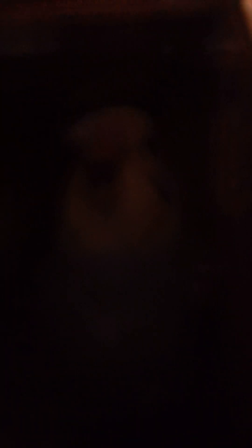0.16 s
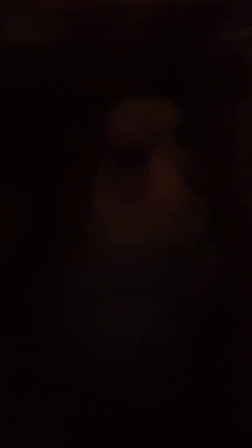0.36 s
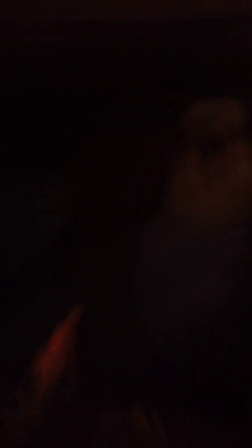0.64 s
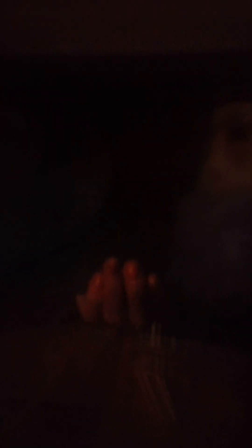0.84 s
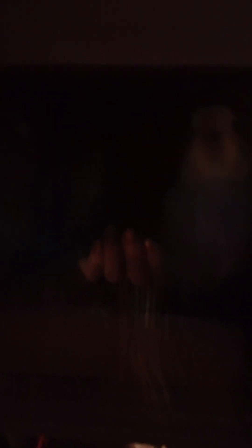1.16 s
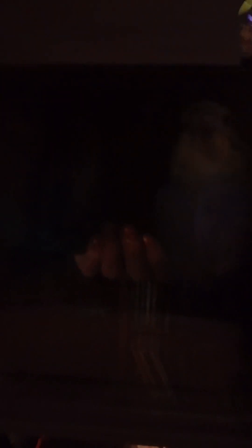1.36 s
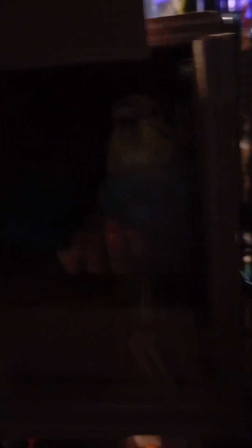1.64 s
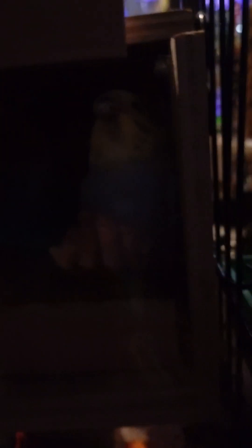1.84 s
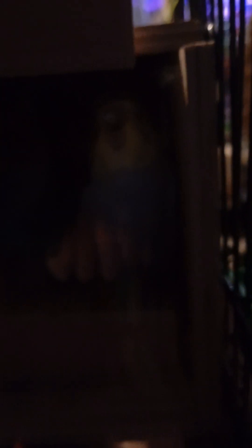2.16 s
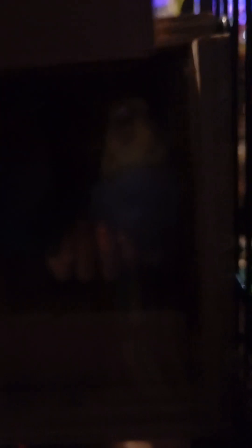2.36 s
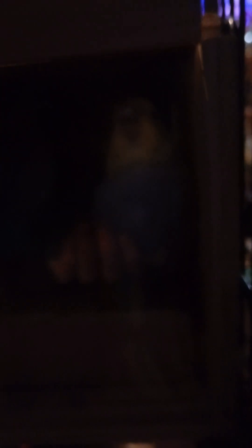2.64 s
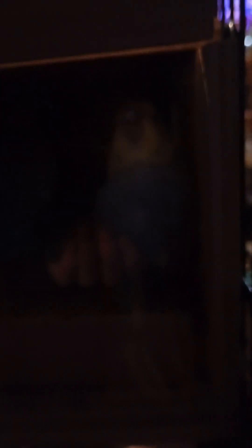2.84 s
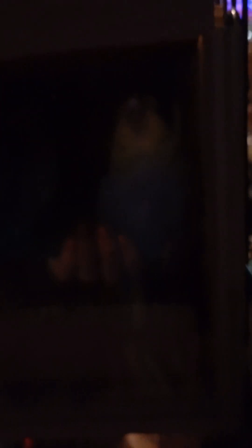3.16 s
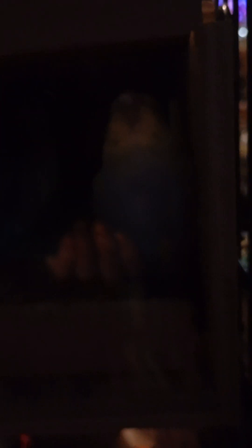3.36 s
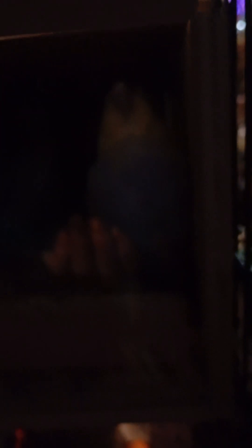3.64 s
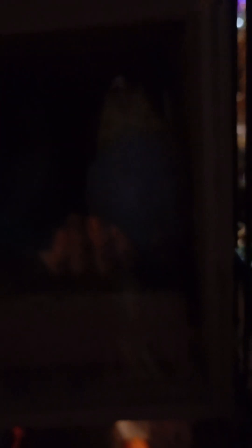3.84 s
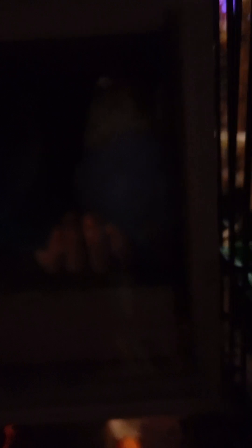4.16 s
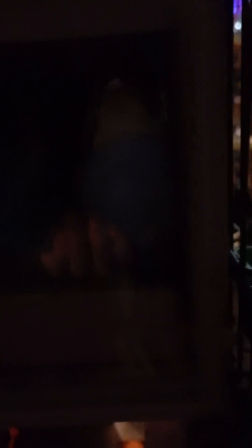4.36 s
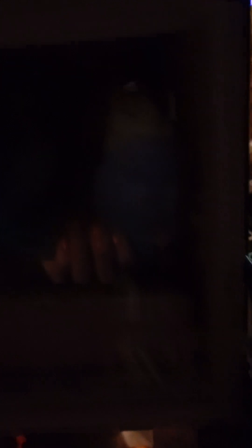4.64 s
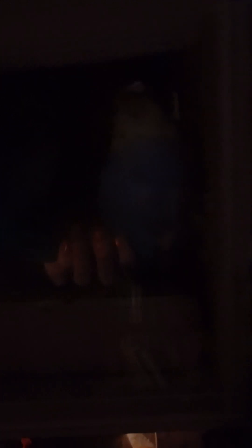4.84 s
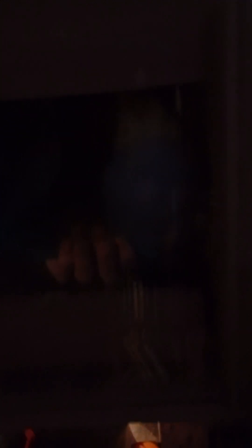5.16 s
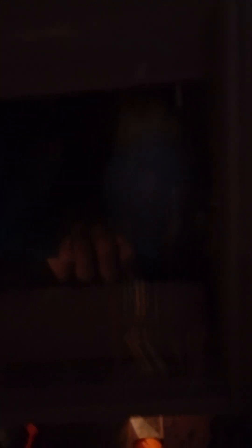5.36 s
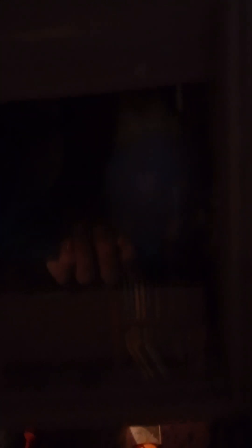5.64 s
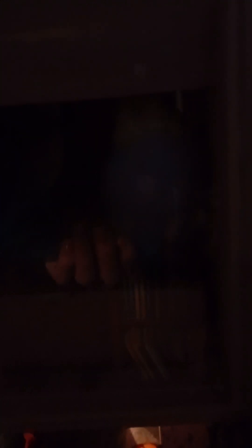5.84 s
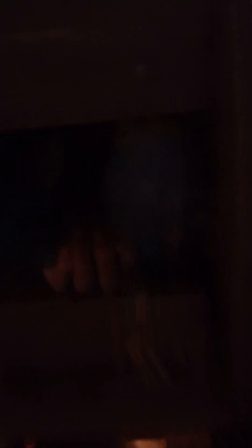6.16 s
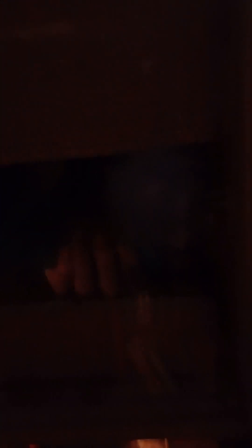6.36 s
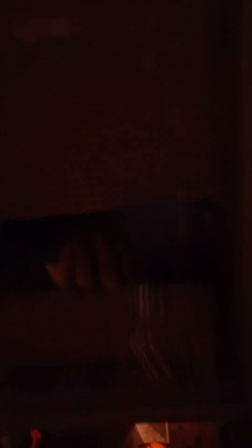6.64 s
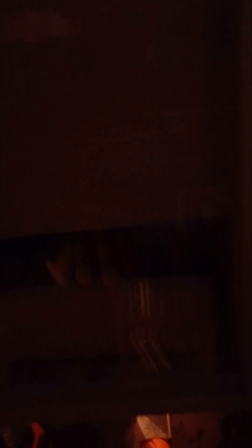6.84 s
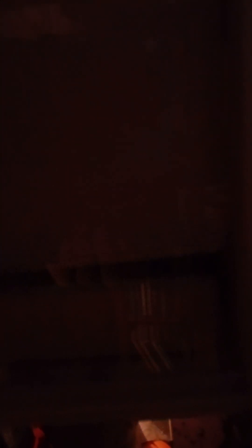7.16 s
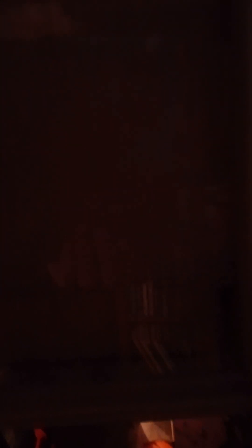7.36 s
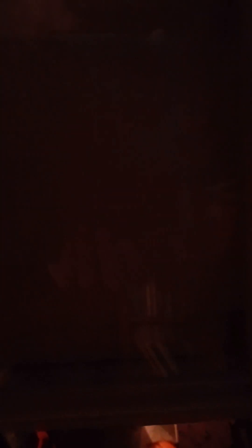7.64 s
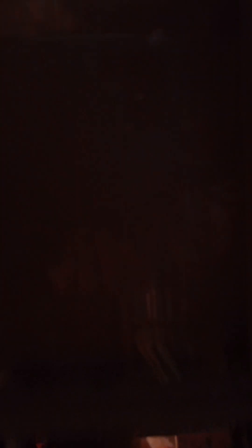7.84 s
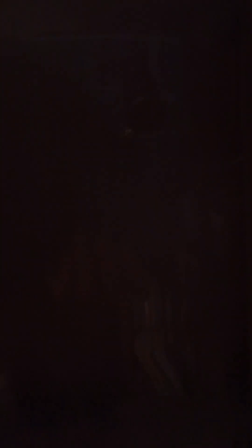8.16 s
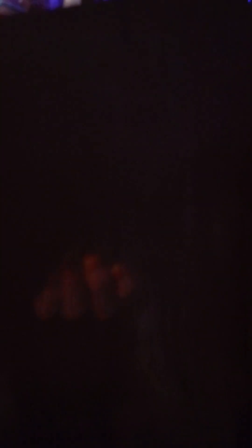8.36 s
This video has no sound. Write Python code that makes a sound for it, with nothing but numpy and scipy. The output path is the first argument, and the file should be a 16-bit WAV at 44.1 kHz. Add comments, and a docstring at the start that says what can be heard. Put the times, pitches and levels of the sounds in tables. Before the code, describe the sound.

Two budgie chicks beg without pause inside a hollow nest box, very close to the microphone in a quiet room. One gives hoarse, buzzy rasps about five times a second; a clearer one cheeps across it in quick rattling bursts. Small dull knocks dot the middle. From about six seconds a cover rustles as it slides, the clear cheeps weaken, and a hard thump with a click ends it.

```python
"""A nest box in a quiet room: two budgie chicks beg close to the microphone.
A hoarse one rasps about five times a second, and a clearer one cheeps across it.
Each call is a rattle of tiny, mostly upward pitch sweeps, coloured by the throat and the hollow box.
Knocks are short sinking tones with a noisy scuff; a tap is a bare click.
The box's cover, made of shaped noise, rustles as it slides, and a thump sounds near the end."""
import sys
import numpy as np
from scipy import signal
from scipy.fft import rfft, irfft, next_fast_len
from scipy.io import wavfile
from scipy.ndimage import uniform_filter1d, minimum_filter1d, map_coordinates

SR = 44100
rng = np.random.default_rng(int(sys.argv[2]) if len(sys.argv) > 2 else 0)


def persist_wave(psi):
    """Save psi, clipped to +-1, as 16-bit WAV."""
    counts = np.round(np.clip(psi, -1, 1) * 32767).astype(np.int16)
    wavfile.write(sys.argv[1], SR, np.atleast_2d(counts).T)


N = 375291  # length of the scene in samples

# calls of the clearer chick: start_s, end_s, level_db, swell_db (from opening to close)
CHEEPS = [(0.074, 0.236, -21, 0.5), (0.307, 0.468, -20, 0.5), (0.53, 0.669, -19, 1.5),
          (0.742, 0.887, -20.5, -0.5), (0.958, 1.103, -22, 3.5), (1.184, 1.324, -22, 1),
          (1.401, 1.534, -24, 7.5), (1.649, 1.795, -24.5, 1.5), (1.884, 2.046, -26, 6.5),
          (2.127, 2.271, -24, 5.5), (2.341, 2.501, -24.5, 7.5), (2.594, 2.753, -23, 0),
          (2.826, 2.992, -23.5, 3), (3.08, 3.256, -23.5, 5.5), (3.334, 3.516, -26, 6.5),
          (3.632, 3.841, -28, 11.5), (3.923, 4.112, -24, 6), (4.216, 4.402, -22, 0.5),
          (4.529, 4.691, -23, 4), (4.786, 4.997, -24, 4), (5.09, 5.262, -22.5, 2.5), (5.356, 5.528, -22, 4),
          (5.613, 5.802, -22, 3.5), (5.888, 6.071, -22, 1.5), (6.149, 6.366, -22, 4.5),
          (6.446, 6.62, -22.5, 0.5), (6.729, 6.893, -29.5, 9), (6.979, 7.182, -28, 4),
          (7.257, 7.437, -26.5, 5), (7.507, 7.7, -29, 6), (7.785, 8.002, -30, 1),
          (8.061, 8.275, -30.5, 10.5), (8.371, 8.506, -31, 1)]
# its calls grow purer as it settles, and a little lower: time_s, top_pitch_hz, overtone_db
CHEEP_VOICE = [(.1, 2679, 1.5), (.8, 2663, -1.5), (1.5, 2545, -2), (3.5, 2682, -2), (4.3, 2546, -3),
               (5.2, 2574, -8.5), (5.8, 2623, -8.5), (6.4, 2582, -13.5), (8.4, 2619, -13)]
# its voice colour: pitch_hz, gain_db
CLEAR_COLOUR = [(900, -32.5), (1450, 5.5), (2000, 4), (2420, -1.5), (2900, -1.5), (3300, 10.5), (4300, -4),
                (5100, 3.5), (6400, -6.5), (7700, -4.5), (10000, -11), (15000, -16)]

# calls of the hoarse chick: start_s, end_s, level_db (before its voice colour)
RASPS = [(.076, 0.165, -32.5), (.239, 0.333, -30), (0.428, .517, -32.5), (0.594, 0.665, -34.5),
         (.91, 1.009, -32.5), (1.099, 1.219, -33.5), (1.308, 1.421, -33.5), (1.501, 1.637, -37),
         (1.712, 1.821, -32.5), (1.892, 2.012, -31.5), (2.092, 2.205, -31), (2.278, 2.386, -30.5),
         (2.466, 2.571, -31.5), (2.664, 2.766, -32), (2.851, 2.967, -30), (3.048, 3.158, -30),
         (3.239, 3.344, -31), (3.438, 3.56, -32), (3.637, 3.756, -33), (3.837, 3.943, -32),
         (4.035, 4.143, -33.5), (4.23, 4.358, -32), (4.437, 4.554, -32), (4.643, 4.758, -34.5),
         (4.845, 4.957, -32.5), (5.044, 5.168, -32), (5.254, 5.37, -33.5), (5.472, 5.606, -33.5),
         (5.702, 5.828, -35.5), (5.944, 6.078, -32.5), (6.271, 6.391, -33.5), (6.473, 6.604, -31.5),
         (6.685, 6.817, -31), (6.892, 7.019, -31.5), (7.104, 7.234, -32), (7.324, 7.467, -31.5),
         (7.552, 7.683, -31.5), (7.779, 7.904, -31.5), (7.992, 8.117, -34.5), (8.19, 8.322, -35),
         (8.402, 8.519, -35)]
# its voice colour: pitch_hz, gain_db
HOARSE_COLOUR = [(400, -19), (700, -7.5), (900, 0), (1250, 6.5), (1800, 9), (2450, 13.5), (3000, 9.5),
                 (3900, -0.5), (5000, 8.5), (6100, 6.5), (7200, -19), (8500, -11.5), (10000, -30.5),
                 (15000, -40.5)]
# its throat tightens after the first calls, then slackens and rings more: time_s, resonance_hz, boost_db
THROAT = [(.08, 1105, 7.5), (.43, 1146, 6.5), (.91, 1454, 9), (3, 1486, 10.5), (6.45, 1537, 12),
          (7.8, 1299, 13.5), (8.4, 1313, 13.5)]
# its nasal colour, a peak or a hollow by turns: time_s, centre_hz, boost_db
NASAL = [(.08, 3500, 3), (.5, 3610, 10.5), (1.08, 3370, -3), (1.31, 3466, 20), (1.5, 3420, 24.5),
         (1.8, 3386, 10), (3.2, 3340, -2), (3.55, 3164, 8.5), (4.65, 3100, 3.5), (5.95, 3830, -8),
         (6.27, 3400, 1.5), (7.1, 3660, 0.5), (7.35, 3825, -14.5), (8.4, 3965, -6.5)]
# its beak resonance and the fizz: time_s, resonance_hz, boost_db, fizz_db (before the fizz colour)
BEAK = [(.08, 5400, -7, -39.5), (.24, 5660, 9.5, -34), (.6, 5660, 13.5, -40), (.91, 5490, 3, -44.5),
        (1.31, 5540, -4, -53), (1.65, 5170, 9.5, -45.5), (2.22, 5748, 13.5, -36), (2.9, 5507, 11.5, -42.5),
        (3.84, 5697, 12, -39.5), (5.04, 5225, 9.5, -40.5), (5.7, 5275, 9.5, -41.5), (6.4, 6002, 3.5, -40.5),
        (6.85, 5210, 5.5, -44), (7.55, 5600, 0.5, -44), (8.2, 6120, 6, -42.5)]
# colour of the fizz, the rasp's highest overtones: pitch_hz, gain_db
FIZZ_COLOUR = [(2000, -52), (6500, 7), (8400, 1.5), (9500, -5), (12000, -3), (13500, -15), (15800, -19.5)]
# the fizz turns duller or brighter as the chick shifts: time_s, tilt_db_per_octave
FIZZ_TILT = [(0, -4), (2, -7), (4, 0.5), (6, -1.5), (8.5, 8)]

# peaks and a hollow of the nest box: centre_hz, half_width_hz, boost_db
BOX = [(916.3, 32.4, 7), (1555, 34.8, 3), (2414, 193, 5.5), (3370, 203, 1.5), (4266, 716, -3),
       (4933.4, 50, 2), (5843, 42.3, 4), (8640, 254, 3)]
# time for an echo to fade by 60 dB, in the box and in the room: pitch_hz, fade_s
BOX_DECAY = [(500, .04), (2500, .05), (6000, .04), (14000, .03)]
ROOM_DECAY = [(300, 0.265), (2500, 0.107), (6000, 0.195), (14000, 0.17)]

# knocks on the box: start_s, thud_peak_db, starting_pitch_hz, scuff_db (against the thud), fade_s (by 60 dB)
KNOCKS = [(1.617, -27, 160, 0.5, 0.027), (3.5, -47, 110, -22, .06), (3.884, -31.5, 351, -1.5, 0.0355),
          (4.005, -42.5, 349.5, -2.5, 0.0908), (4.252, -30, 423.5, -5.5, 0.128),
          (4.267, -30.5, 628, -10, 0.063), (4.599, -37.5, 189.4, -7.5, 0.048),
          (4.873, -39.5, 262, -5, 0.069), (4.925, -39.5, 198, -4.5, 0.057), (5.45, -48.5, 198.7, -6, 0.056),
          (5.541, -40.5, 139, -11, 0.053), (5.949, -37, 169.3, -11.5, 0.0528),
          (8.14, -43.5, 255, -25.5, 0.142), (8.44, -8.5, 207.6, -9, 0.0153)]
# sharp taps of the cover: start_s, starting_level_db
TAPS = [(8.494, -0.5)]
# pushes of the cover: loudest_s, length_s, rustle_db, rumble_db
PUSHES = [(6.596, 0.99, -52, -77.5), (7.254, 0.409, -49, -72.5), (7.84, 0.325, -45, -77),
          (8.151, 0.43, -64.5, -62), (8.329, 0.174, -58.5, -49), (8.491, 0.128, -40.5, -39.5)]

# noise colours of the cover and the room, before levelling: pitch_hz, density_db
RUSTLE = [(60, -24), (170, -11.5), (260, 5.5), (400, -10.5), (700, -3.5), (1200, -4.5), (2500, -10),
          (10000, -42.5)]
RUMBLE = [(25, -24), (60, -5.5), (105, 17.5), (170, -6), (400, -50)]
ROOM_TONE = [(20, -35), (50, -4.5), (100, 2.5), (170, -5.5), (260, -3.5), (340, 5), (450, -10.5),
             (900, 1.5), (2500, -3.5), (8000, -16.5), (15800, -54)]

TOP_HZ = 15830  # nothing sounds above this
CHEEP_RISE_S, CHEEP_FALL_S = 0.0051, 0.0158
CHEEP_ARCH_DB = 0.46  # the middle of a call stands this far above its swell
CHEEP_OPENING, CHEEP_SINK_S = .1, .028  # a call opens this sharp (log pitch), then sinks
CHEEP_SCATTER = .07  # pitch scatter from pulse to pulse (log pitch), before vigour
RIPPLE_DB, RIPPLE_HZ = 3, 1704  # bands in the fizz and their typical spacing
THUD_SAG_S = 0.3  # a thud's pitch sinks with this time constant
PUSH_FADE_DB = 16.5  # a push starts and ends this far below its peak


def amp(db):
    """Turn decibels into a gain."""
    return 10 ** (np.asarray(db) / 20)


def unit(x):
    """Bring a sound to an average (rms) level of 1."""
    return x / np.sqrt(np.mean(x ** 2) + 1e-20)


def at(curve, s):
    """Read every column of a curve at time s."""
    times, *columns = np.transpose(curve)
    return [np.interp(s, times, column) for column in columns]


def along(points, hz):
    """Read a table of values by frequency, on a log axis as the ear hears pitch."""
    f, v = np.transpose(points)
    return np.interp(np.log(hz + 1), np.log(f), v)


def bell(hz, centre_hz, width_hz):
    """The shape of one resonance: 1 at its centre, half that one width away."""
    return 1 / (1 + ((hz - centre_hz) / width_hz) ** 2)


def wobble(n, rate):
    """A smooth random curve of n samples, with rate knots a second."""
    knots = rng.standard_normal(int(n * rate / SR) + 4)
    return map_coordinates(knots, [np.arange(n) * rate / SR])


def add(track, s, sound):
    """Mix a sound into the track at time s."""
    start = max(0, round(s * SR))
    place = track[start:start + len(sound)]
    place += sound[:len(place)]


def fade(n, rise, fall):
    """Open and close a call with straight ramps, in seconds."""
    t = np.arange(n) / SR
    return np.clip(t / rise, 0, 1) * np.clip((n / SR - t) / fall, 0, 1)


def filtered(x, gain):
    """Change the strength of each frequency in x."""
    m = next_fast_len(N + 8192)
    return irfft(rfft(x, m) * gain(np.fft.rfftfreq(m, 1 / SR)), m)[:N]


def noise(spectrum):
    """Coloured noise at an rms level of 1."""
    white = rng.standard_normal(N)
    return unit(filtered(white, lambda hz: amp(along(spectrum, hz))))


def resonate(x, colour_db, size=2048):
    """Ring x through a voice colour and the box's resonances, with no ringing ahead of the sound."""
    hz = np.fft.rfftfreq(size, 1 / SR)
    box_db = sum(peak * bell(hz, centre, width) for centre, width, peak in BOX)
    cepstrum = irfft(np.log(amp(colour_db(hz) + box_db)))
    # folding the cepstrum onto positive times makes the ringing follow the sound
    cepstrum[1:size // 2] *= 2
    cepstrum[size // 2 + 1:] = 0
    ringing = irfft(np.exp(rfft(cepstrum)))
    return signal.fftconvolve(x, ringing)


def rattle(n, rate, uneven, count=48):
    """Uneven pulses: progress 0-1 through each, and its chance values (length, pitch, size, slant)."""
    chance = np.clip(rng.standard_normal((count, 4)), -2, 2)
    edges = np.r_[0, np.cumsum(np.exp(uneven * chance[:, 0]) / rate)]
    place = np.interp(np.arange(n) / SR, edges, np.arange(count + 1))
    return place % 1, chance[place.astype(int) % count].T


def clear_chick():
    """Each pulse is an arching whistle; longer ones start lower and sound louder, and a call opens high."""
    voice = np.zeros(N)
    for start, end, db, swell_db in CHEEPS:
        top_hz, overtone_db = at(CHEEP_VOICE, start)
        n = int((end - start + 0.0063) * SR)
        u, (length, pitch, size, slant) = rattle(n, rate=115, uneven=.13)

        # pitch: the arch is how far each moment lies below the top
        arch = np.interp(u ** np.exp(.25 * slant), [0, .18, .4, .64, 1], [1, .45, .12, 0, .35])
        opening = CHEEP_OPENING * np.exp(-np.arange(n) / SR / CHEEP_SINK_S)
        # gentle calls, poor in overtones, also sweep and scatter less
        vigour = amp(.4 * overtone_db)
        depth = (.5 + .1 * length) * vigour
        scatter = CHEEP_SCATTER * vigour * pitch
        f0 = top_hz * np.exp(opening + scatter - depth * arch + .025 * wobble(n, rate=900))
        phase = 2 * np.pi * np.cumsum(f0) / SR

        # tone: a whistle, flickering overtones and a little breath
        upper = np.sin(2 * phase)
        for k, part_db in [(3, -17), (4, -27.5), (5, -30.5)]:
            upper += amp(part_db) * np.sin(k * phase)
        overtones = amp(overtone_db + 2.18 * wobble(n, rate=230)) * upper
        whistle = np.sin(phase) + overtones + 0.035 * rng.standard_normal(n)

        # loudness: a push for each pulse, and a swell over the whole call
        push = np.interp(u, [0, .17, .42, .66, .86, 1], [0, .45, 1, .9, .08, 0])
        push *= amp(.6 * length + 1.9 * size)
        source = whistle * push * fade(n, CHEEP_RISE_S, CHEEP_FALL_S)
        call = unit(resonate(source, lambda hz: along(CLEAR_COLOUR, hz))[:n + SR // 100])
        effort_db = np.interp(np.arange(len(call)) / n, [1 / 6, 1 / 2, 5 / 6],
                              [-swell_db / 2, CHEEP_ARCH_DB, swell_db / 2])
        add(voice, start, amp(db + effort_db) * call)
    return voice


def hoarse_chick(count=24):
    """Each pulse is a few buzzy beats of the voice organ, speeding up, with restless overtones and fizz."""
    voice = np.zeros(N)
    for start, end, db in RASPS:
        throat_hz, throat_db = at(THROAT, start)
        nasal_hz, nasal_db = at(NASAL, start)
        tilt_db, = at(FIZZ_TILT, start)
        beak_hz, beak_db, fizz_db = at(BEAK, start)
        n = int((end - start + 0.00492) * SR)
        u, (length, pitch, size, slant) = rattle(n, rate=119, uneven=.07)

        # pitch: each pulse climbs about 1.45 octaves from near 660 Hz
        climb = 2 ** (1.45 * u * (1 + .2 * slant))
        scatter = .1 * pitch - 0.04915 * length + 0.02394 * wobble(n, rate=1000)
        f0 = 660 * climb * np.exp(scatter)
        phase = 2 * np.pi * np.cumsum(f0) / SR

        # tone: every overtone flickers by itself
        buzz = np.zeros(n)
        for k in range(1, count):
            flicker = amp(2.5 * wobble(n, rate=150))
            buzz += flicker * np.cos(k * phase + rng.uniform(0, 2 * np.pi)) * (k * f0 < TOP_HZ)
        breathy = unit(buzz) + .07 * rng.standard_normal(n)
        push = np.interp(u, [0, .12, .58, .79, .9, 1], [0, 1, 1, .4, .04, 0]) * amp(.9 * size)
        source = unit(push * fade(n, rise=.011, fall=.017) * breathy)

        def colour(hz):
            """Throat, nose and beak each strengthen or hollow out a band of the voice."""
            return (along(HOARSE_COLOUR, hz) + throat_db * bell(hz, throat_hz, width_hz=150)
                    + nasal_db * bell(hz, nasal_hz, width_hz=584) + beak_db * bell(hz, beak_hz, width_hz=530))

        # the band spacing shifts from call to call
        spacing_hz = RIPPLE_HZ * np.exp(rng.normal(0, 0.105))

        def fizz_colour(hz):
            """The highest overtones, tilted duller or brighter and rippled into bands."""
            tilt = tilt_db * np.log2(np.maximum(hz, 7000) / 10500)
            return along(FIZZ_COLOUR, hz) + tilt + RIPPLE_DB * np.cos(2 * np.pi * hz / spacing_hz)

        add(voice, start, amp(db) * resonate(source, colour))
        add(voice, start, amp(fizz_db) * resonate(source, fizz_colour))
    return voice


def knocks():
    """Dull blows sink in pitch and soon die away, with a short noisy scuff; taps are bare clicks."""
    thuds, scuffs, clicks = np.zeros((3, N))
    t = np.arange(SR // 6) / SR
    for s, db, hz, scuff_db, fade_s in KNOCKS:
        blow = (1 - np.exp(-t / 0.00128)) ** 2 * amp(-60 * t / fade_s)
        blow = amp(db) * blow / blow.max()
        phase = 2 * np.pi * np.cumsum(hz * np.exp(-t / THUD_SAG_S)) / SR
        add(thuds, s, blow * np.sin(phase))
        add(scuffs, s, amp(scuff_db) * blow)
    for s, db in TAPS:
        add(clicks, s, amp(db - 60 * t / 0.0013) * np.sin(2 * np.pi * 1100 * t))
    scuff_noise = noise([(40, -35), (120, -9), (400, 1), (750, -1.0), (1200, -16), (3000, -33)])
    return thuds + clicks + scuffs * scuff_noise


def cover():
    """Each push swells and fades: the cover rubs unevenly and shakes the box."""
    t = np.arange(N) / SR
    rub, shake = np.zeros((2, N))
    for s, length, rustle_db, rumble_db in PUSHES:
        swell = amp(-PUSH_FADE_DB * ((t - s) / (length / 2)) ** 2)
        rub += amp(rustle_db) * swell
        shake += amp(rumble_db) * swell
    uneven = amp(1.37 * wobble(N, rate=31))
    return rub * uneven * noise(RUSTLE) + shake * noise(RUMBLE)


def echoes(x, decay, delay, count=4):
    """Walls answer with a fading blur of noise, which drifts slowly through several random patterns."""
    out = np.zeros(N)
    place = np.linspace(0, 2 * count, N)  # passes through all the patterns twice
    for k in range(count):
        hz, t, z = signal.stft(rng.standard_normal(SR // 3), SR, nperseg=128)
        fading = z * amp(-60 * t / along(decay, hz)[:, None])
        tail = signal.istft(fading, SR, nperseg=128)[1]
        distance = abs((place - k + count / 2) % count - count / 2)
        share = np.sqrt(np.clip(1 - distance, 0, 1))
        add(out, delay, signal.oaconvolve(x * share, tail / np.linalg.norm(tail)))
    return out


def room_hush():
    """The quiet room's steady background noise."""
    return amp(-55) * noise(ROOM_TONE)


def scene():
    """Chicks in the echoing box, knocks on it, the room's faint answer, the cover and a steady hush."""
    chicks = clear_chick() + hoarse_chick()
    box_echo = amp(-6) * echoes(chicks, BOX_DECAY, delay=.0007, count=8)
    boxed = chicks + box_echo + knocks()
    room_echo = amp(-19.5) * echoes(boxed, ROOM_DECAY, delay=0.0071)
    return boxed + room_echo + cover() + room_hush()


def record(dry, size=45):
    """A quick limiter ducks the highest peaks; the microphone drops deep bass and all above TOP_HZ."""
    ceiling = .54
    needed = ceiling / np.maximum(abs(dry), ceiling)
    # hold the lowest gain around each peak, then smooth it; size is in samples
    gain = uniform_filter1d(minimum_filter1d(needed, 2 * size), size)
    low_cut_hz = 55

    def microphone(hz):
        """Bass falls away below the low cut; the top stops short."""
        return (hz < TOP_HZ) * hz ** 2 / np.hypot(hz ** 2, low_cut_hz ** 2)

    return filtered(np.ravel(dry * gain), microphone)[None]


dry = scene()
out = record(dry)
persist_wave(out)
```